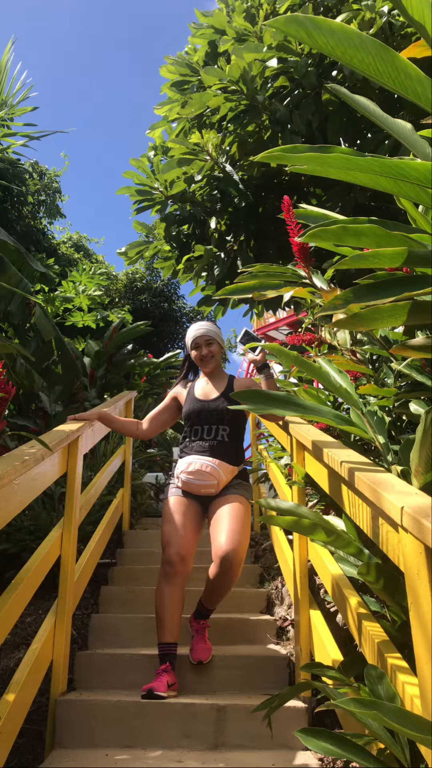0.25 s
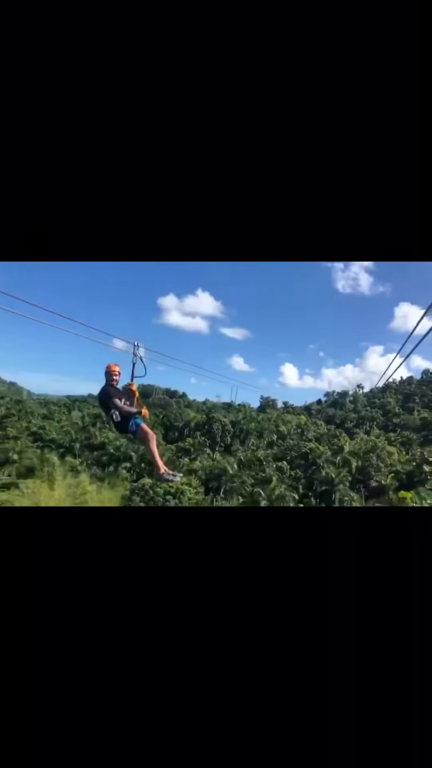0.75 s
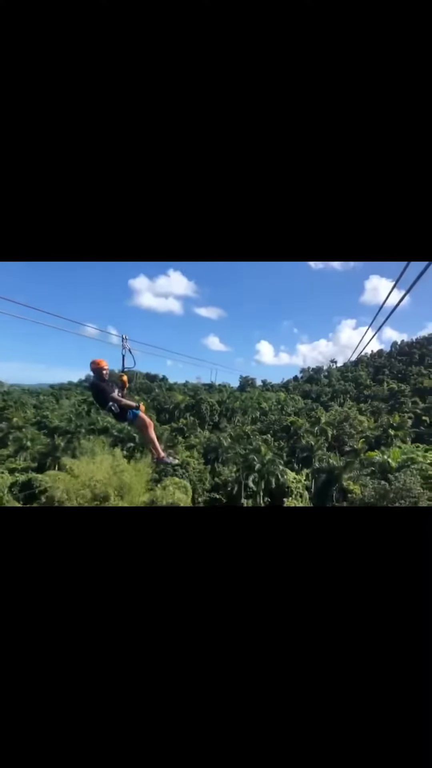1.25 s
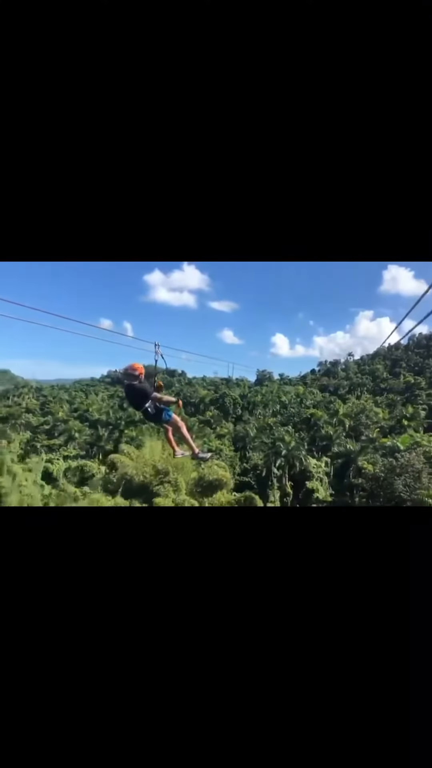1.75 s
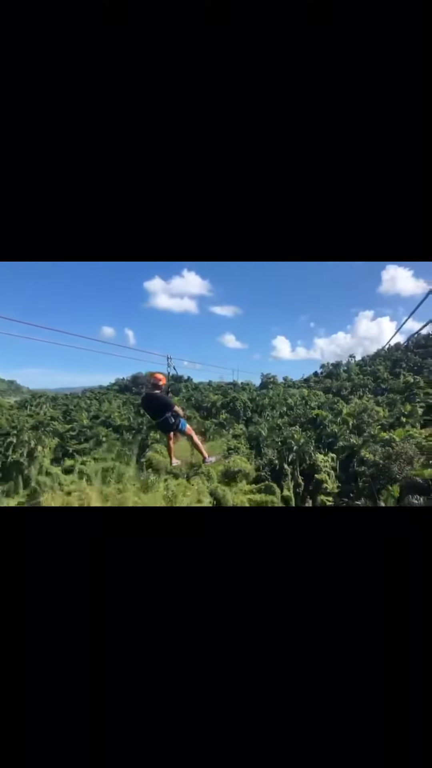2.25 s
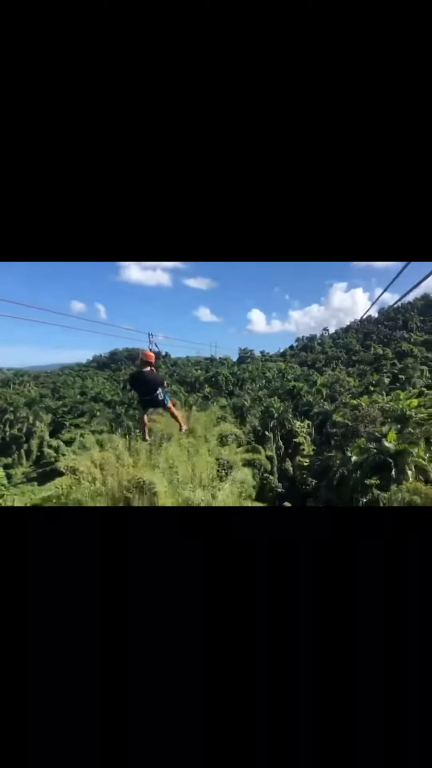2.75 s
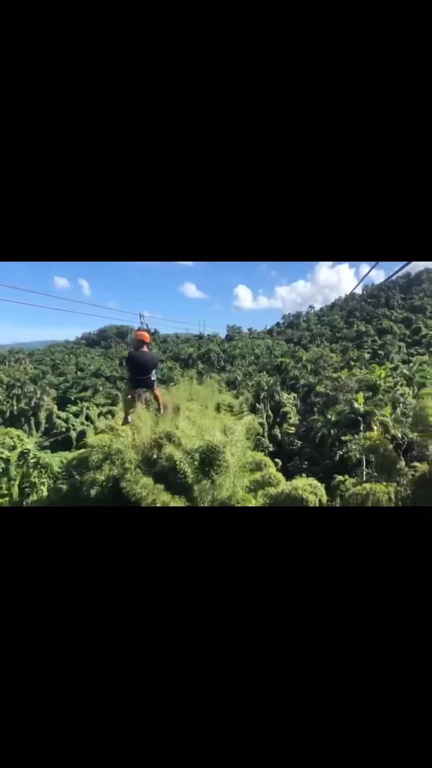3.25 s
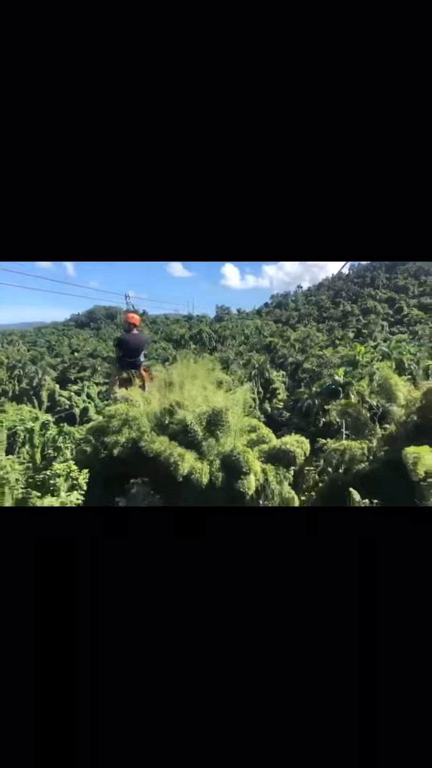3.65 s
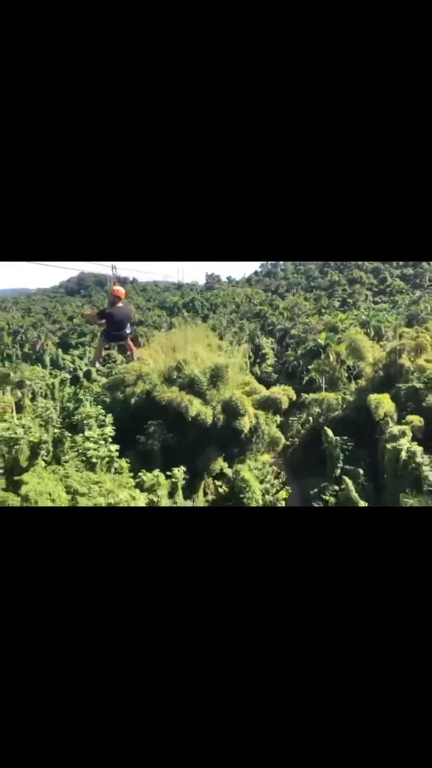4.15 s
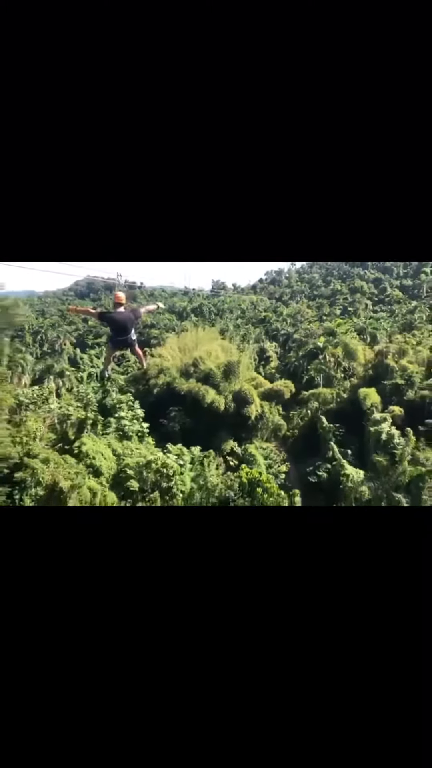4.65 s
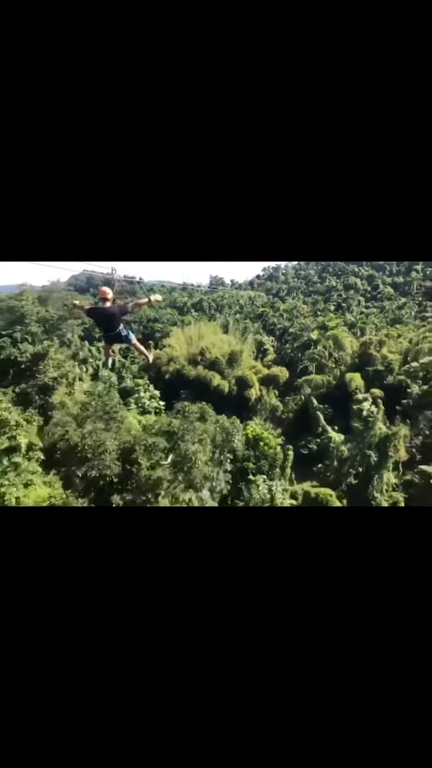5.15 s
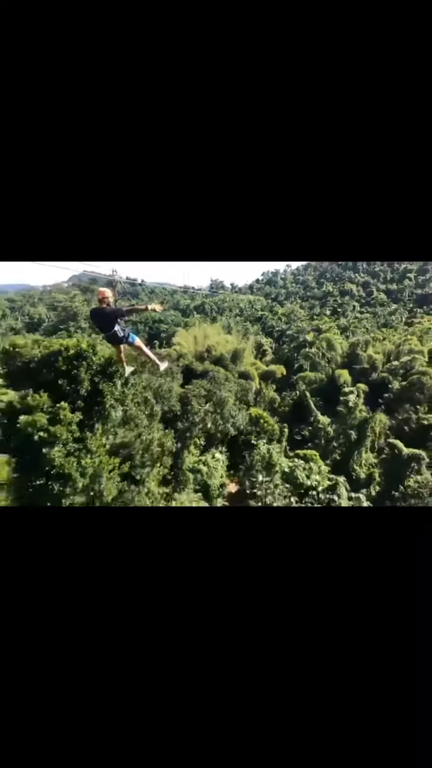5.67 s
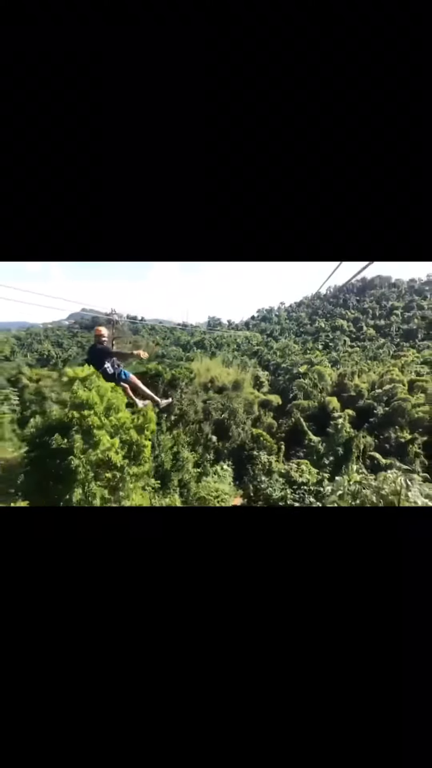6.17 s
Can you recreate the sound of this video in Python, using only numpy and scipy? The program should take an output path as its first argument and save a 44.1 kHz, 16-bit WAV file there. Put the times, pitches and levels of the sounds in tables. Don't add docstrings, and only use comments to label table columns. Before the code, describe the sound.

Outdoors, silence for half a second, then abruptly a zipline trolley is rolling on steel cable: a loud, bright, steady metallic hiss with a thin, slightly beating whine that slowly sinks in pitch as it slows. Wind flutters, puffs and thumps on the microphone, strongest in the middle. The sound is close, nearly mono, slightly grainy, and ends still rolling.

```python
import sys
import numpy as np
from scipy import signal
from scipy.fft import rfft, irfft, next_fast_len
from scipy.io import wavfile
from scipy.ndimage import uniform_filter1d

SR = 44100
rng = np.random.default_rng(int(sys.argv[2]) if len(sys.argv) > 2 else 0)


def dump(signal):
    limited = np.clip(np.atleast_2d(signal).T, -1, 1)
    pcm = np.round(limited * 32767).astype(np.int16)
    wavfile.write(sys.argv[1], SR, pcm)


def rack_gain(trim_db):
    fader = np.asarray(trim_db, float)
    return 10 ** (fader / 20)


N = 282681

# start_s [s], strand_rate_hz [Hz], second_wheel_above_first_hz [Hz]
STRAND = [(0.52, 1523.2, 14.5), (0.85, 1514.2, 20), (1.15, 1504.7, 23.5), (1.55, 1496, 19), (2.0, 1470, 26),
          (2.45, 1457, 17), (2.95, 1422, 20.5), (3.3, 1407, 23), (3.7, 1383.2, 18), (4.0, 1371.9, 18),
          (4.17, 1361.5, 22.5), (4.55, 1349, 21), (4.9, 1329.7, 24), (5.25, 1313, 17.5), (5.5, 1304.3, 18),
          (5.9, 1284, 17.5), (6.41, 1262.9, 16)]


def rms_one(x):
    return x / np.sqrt(np.mean(x ** 2) + 1e-20)


def in_time(rows):
    s, *columns = np.transpose(rows)
    return [np.interp(np.arange(N) / SR, s, column) for column in columns]


def to_spectrum(x):
    return rfft(x, next_fast_len(N))


def to_sound(spectrum):
    return irfft(spectrum, next_fast_len(N))[:N]


def bins_hz():
    size = next_fast_len(N)
    return np.maximum(np.arange(size // 2 + 1) * SR / size, 1)


def at_hz(points, hz):
    table_hz, table_db = np.transpose(points)
    return np.interp(np.log(hz), np.log(table_hz), table_db)


def drift(rate_hz):
    r = np.exp(-40 * np.pi * rate_hz / SR)
    noise = rng.standard_normal(N // 20 + 2002)
    slow = signal.lfilter([1], [1, -2 * r, r * r], noise)[2000:]
    return np.interp(np.arange(N) / 20, np.arange(len(slow)), rms_one(slow))


def band(x, low_hz, high_hz, order):
    return signal.sosfilt(signal.butter(order, [low_hz, high_hz], "band", fs=SR, output="sos"), x)


def resonance(hz, centre_hz, width_hz):
    return 1 / (1 + (2 * (hz - centre_hz) / width_hz) ** 2)


def hiss(shake_db, chatter_db, patchy_db):
    # start_s [s], level_db [dB]
    load = [
        (0.52, -18.5),
        (1.5, -19),
        (2.5, -17),
        (3.0, -18.5),
        (3.5, -17.5),
        (4.1, -17),
        (4.5, -17),
        (5.4, -17),
        (6.41, -17),
    ]
    # pitch_hz [Hz], level_db [dB per Hz]
    wires = [(500, -33.5), (1100, -24), (1700, -18), (2300, -12.5), (3500, -10), (4300, -7), (5000, -4),
             (6300, -2), (7600, -6), (9200, 0), (11000, -5), (13000, -5.5), (14500, -6), (15700, -8.5)]
    # pitch_hz [Hz], width_hz [Hz], level_db [dB]
    metal = [(2720, 350, 3.5), (3120, 250, -4.5), (3650, 250, 1.5), (4250, 250, 1.5), (4610, 160, 4.5),
             (4920, 200, -2.5), (5130, 90, 3.5), (5500, 300, 1.5), (6020, 500, 2.5), (6450, 200, -2.5),
             (8180, 120, 3.5), (9670, 150, 4.5), (14200, 600, 2.5), (14610, 160, 2.0), (14900, 300, -2.0)]
    load_db, = in_time(load)
    strand_hz = in_time(STRAND)[0]
    slowing = (strand_hz.mean() - strand_hz) / np.ptp(strand_hz)
    body_db = 0.2
    plates_db = 0.2 + 2.2 * np.tanh(5.0 * (slowing + .2)) / 2
    axle_db = .05 + 1.1 * slowing

    hz = bins_hz()
    colour_db = at_hz(wires, hz)
    for centre_hz, width_hz, db in metal:
        colour_db = colour_db + db * resonance(hz, centre_hz, width_hz)
    unsteady_db = shake_db * drift(3.3) + chatter_db * (drift(37) + drift(330))
    contacts = rng.standard_normal(N) * rack_gain(unsteady_db)
    ringing = to_spectrum(contacts) * rack_gain(colour_db)
    reference = to_sound(ringing * (hz > 6500) * (hz < 12000))
    ringing = ringing / np.sqrt(np.mean(reference ** 2))

    centres_hz = np.geomspace(800, 16000, 14)
    out = np.zeros(N)
    for k, centre_hz in enumerate(centres_hz):
        share = np.interp(np.log(hz), np.log(centres_hz), np.arange(len(centres_hz)) == k)
        if centre_hz < 3900:
            part_db = body_db
        elif centre_hz < 6500:
            part_db = plates_db
        elif centre_hz > 12000:
            part_db = axle_db
        else:
            part_db = 0
        out += to_sound(ringing * share) * rack_gain(part_db + patchy_db * drift(9))
    return rack_gain(load_db) * out


def whine(gain_db, waver_hz, flicker_db, third_db, second_octave_db):
    # start_s [s], first_wheel_db [dB], second_wheel_db [dB]
    pressure = [
        (0.52, -46, -48),
        (1.45, -46.5, -51),
        (2.05, -42.5, -48),
        (2.9, -43.5, -47),
        (3.55, -44, -50.5),
        (4.45, -44.5, -50.5),
        (5.05, -45.5, -52.5),
        (5.95, -46, -53.5),
        (6.41, -48, -46.5),
    ]
    hz, apart_hz = in_time(STRAND)
    tone_db, second_db = in_time(pressure)
    octave_db = tone_db + 0.5 + 4.5 * resonance(2 * hz, centre_hz=2724, width_hz=480)
    first = 2 * np.pi * np.cumsum(hz + waver_hz * drift(4)) / SR
    second = 2 * np.pi * np.cumsum(hz + apart_hz + 2 * waver_hz * drift(5.7)) / SR
    tones = [(first, tone_db), (2 * first, octave_db), (3 * first, octave_db + third_db),
             (second, second_db), (2 * second, second_db + second_octave_db)]
    out = np.zeros(N)
    for phase, db in tones:
        level = np.sqrt(2) * rack_gain(db + gain_db + flicker_db * drift(14))
        out += level * np.sin(phase)
    return out


def puffs(eddies, drop, swirl_hz, swirl_db, spread):
    half = round(.05 * SR)
    out = np.zeros(N + half)
    t = np.arange(-half, half) / SR
    noise = rms_one(band(rng.standard_normal(N + half), *swirl_hz, order=2))
    for s, db, ms, hz in eddies:
        middle = round(s * SR)
        span = slice(middle - half, middle + half)
        u = t * 1000 / ms
        turns = rng.random() + hz * t * (1 - drop * np.tanh(u))
        swing = np.exp(-2.8 * u ** 2) * np.sin(2 * np.pi * turns)
        swirl = rack_gain(swirl_db) * np.exp(-np.abs(u) / spread) * noise[span]
        out[span] += rack_gain(db) * (swing + swirl)
    return out[:N]


def small_eddies():
    # start_s [s] (middle of the puff), level_db [dB peak], length_ms [ms]
    strong = [(0.672, -26, 4.3), (0.754, -27, 1.7), (0.863, -30.5, 3.7), (1.258, -22, 2.6),
              (1.37, -23.5, 1.6), (1.581, -23, 3.2), (1.722, -26, 4.3), (1.78, -18.5, 1.7),
              (1.815, -21, 3.2), (2.08, -20, 1.5), (2.134, -16.5, 1.7), (2.35, -22.5, 5.3),
              (2.371, -19, 1.4), (2.399, -19, 1.7), (2.504, -20.5, 2.4), (2.681, -19, 0.87),
              (2.692, -18, 3.6), (2.868, -20, 2.1), (3.244, -31.5, 8.9), (3.443, -21, 1.8),
              (3.477, -20.5, 2.4), (3.539, -19, 3.4), (3.572, -16.5, 1.2), (3.887, -23.5, 4.2),
              (4.389, -28.5, 4.1), (4.513, -22.5, 1.9), (4.66, -22, 1.2), (4.843, -20.5, 3.3),
              (5.02, -25, 3), (6.106, -31.5, 4.8)]
    # start_s [s] (middle of the puff), level_db [dB peak]
    weak = [(0.559, -33), (0.681, -29), (0.72, -28.5), (0.993, -30), (1.274, -28.5), (1.651, -25),
            (1.831, -26), (1.891, -24.5), (2.024, -25), (2.198, -24.5), (2.24, -25.5), (2.41, -24.5),
            (2.521, -23), (2.628, -31), (2.756, -27.5), (2.778, -25), (3.393, -25), (3.426, -29),
            (3.633, -29), (3.968, -26.5), (4.233, -27), (4.481, -27), (4.733, -30), (4.909, -27.5),
            (5.129, -27.5), (5.141, -27.5), (5.561, -29.5), (5.749, -31), (5.808, -31), (6.349, -30)]
    eddies = []
    for s, db, ms in list(strong) + [(s, db, 2.8) for s, db in weak]:
        scatter = rng.uniform(-.08, .08)
        eddies.append((s, db, ms, (527 + 12 * ms) * (1 + scatter)))
    return puffs(eddies, drop=.45, swirl_hz=(230, 950), swirl_db=-10, spread=3.0)


def big_eddies():
    # start_s [s] (middle of the thump), level_db [dB peak], length_ms [ms], pitch_hz [Hz]
    thumps = [(0.68, -24.5, 9.5, 201), (0.868, -27.5, 4.8, 193), (1.219, -25.5, 12, 175),
              (1.272, -23, 4.1, 200), (1.439, -26, 8.1, 241), (1.587, -19.5, 7.3, 216),
              (1.655, -27.5, 17, 234), (1.724, -22.5, 8.7, 248), (1.822, -27.5, 23, 178),
              (2.086, -18.5, 5.8, 176), (2.139, -15, 4.5, 226), (2.392, -17, 3.4, 167),
              (2.432, -18, 2.6, 205), (2.519, -23, 4.4, 237), (2.646, -28.5, 9.6, 180),
              (2.89, -28.5, 9.1, 132), (3.139, -25, 12, 213), (3.283, -25, 8.4, 220),
              (3.432, -30, 5.7, 255), (3.479, -17, 6.6, 268), (3.542, -23, 5.1, 128),
              (3.575, -19.5, 2.7, 240), (4.135, -29.5, 12, 174), (4.424, -23.5, 4.3, 153),
              (4.519, -24, 8.3, 189), (4.74, -23, 3.7, 164), (4.847, -17, 5.8, 250), (5.15, -26, 8.3, 190),
              (5.757, -25.5, 11, 169), (6.115, -29, 17, 230)]
    return puffs(thumps, drop=0.47, swirl_hz=(60, 300), swirl_db=-9.5, spread=1.5)


def wind(lumpy_db):
    # start_s [s], level_db [dB]
    gust = [(.52, -43.5), (.7, -38.5), (1.1, -42.5), (1.78, -37), (2.3, -37.5), (2.87, -37.5), (3.3, -41),
            (3.52, -35), (3.7, -43), (3.9, -39), (4.28, -42), (4.55, -38.5), (5.1, -40), (5.3, -44.5),
            (5.8, -39), (5.95, -47.5), (6.2, -48), (6.3, -37.5)]
    # pitch_hz [Hz], level_db [dB per Hz]
    rumble = [(25, -38), (40, -34), (60, -3.5), (95, -3.5), (150, -1.5), (250, -11), (400, -29.5),
              (800, -54)]
    # pitch_hz [Hz], level_db [dB per Hz]
    flutter = [(120, -32.5), (220, 0.5), (320, 2), (500, -7), (700, -5.5), (1000, -23.5), (1400, -55)]
    gust_db, = in_time(gust)
    rumble_db = gust_db - 0.5
    flutter_db = gust_db.mean() - 3 + 1.2 * (gust_db - gust_db.mean())
    out = np.zeros(N)
    for colour, level_db, rate_hz in [(rumble, rumble_db, 14), (flutter, flutter_db, 45)]:
        lumps = rng.standard_normal(N) * rack_gain(lumpy_db * drift(rate_hz))
        coloured = to_sound(to_spectrum(lumps) * rack_gain(at_hz(colour, bins_hz())))
        out += rack_gain(level_db) * rms_one(coloured)
    return out


def scene():
    trolley = hiss(shake_db=-0.24, chatter_db=0.46, patchy_db=0.51)
    trolley += whine(gain_db=1.3, waver_hz=.6, flicker_db=.8, third_db=-7, second_octave_db=-7)
    air = small_eddies() + big_eddies() + wind(lumpy_db=4.5)
    mono = trolley + air
    return np.array([mono, mono])


def camera_grain(x, scatter_db):
    # pitch_hz [Hz], step_db [dB against the local level]
    coarseness = [(300, -16), (1500, -11), (4000, -5), (7000, -2), (10500, 1), (15500, 1.5)]
    hop, top, grid = 1024, 731, 680
    n = np.arange(2 * hop)
    window = np.sin(np.pi * (n[:, None] + .5) / (2 * hop))
    basis = window * np.cos(np.pi / hop * np.outer(n + .5 + hop / 2, np.arange(top) + .5))
    padded = np.pad(x, (2 * hop - grid, 3 * hop))
    count = len(padded) // hop - 1
    lines = np.array([padded[k * hop:(k + 2) * hop] for k in range(count)]) @ basis

    bands = np.arange(top) // 16
    nearby = uniform_filter1d(lines ** 2, size=80, axis=1, origin=24)
    nearby = uniform_filter1d(nearby, size=5, axis=0)
    masked = nearby[:, 8::16][:, bands]
    hz = (np.arange(top) + .5) * SR / (2 * hop)
    scatter = rng.standard_normal((count, bands[-1] // 2 + 1))[:, bands // 2]
    step = np.sqrt(masked + 1e-14) * rack_gain(at_hz(coarseness, hz) + scatter_db * scatter)
    whole = np.floor((np.abs(lines) / step) ** .75 + .4054)
    rounded = np.sign(lines) * step * whole ** (4 / 3)

    frames = rounded @ basis.T * 2 / hop
    out = np.zeros((count + 1, hop))
    out[:-1] += frames[:, :hop]
    out[1:] += frames[:, hop:]
    return out.ravel()[2 * hop - grid:][:N]


def stereo_flecks(mono):
    # start_s [s] (middle of the fleck), pitch_hz [Hz] (middle of the band)
    splits = [(1.281, 8900), (1.304, 6300), (1.304, 10350), (1.327, 6950), (1.327, 8950), (2.047, 13800),
              (2.07, 7600), (2.07, 14500), (2.465, 4700), (2.79, 7600), (2.813, 4700), (2.93, 11000),
              (3.069, 13100), (3.394, 4700), (3.719, 8250), (3.719, 15100), (5.321, 10300), (5.321, 14500),
              (5.507, 11050), (6.018, 5500), (6.018, 9600)]
    mid, side = mono.copy(), np.zeros(N)
    fade = np.hanning(2048)
    for s, centre_hz in splits:
        half_hz = min(1450 / 2, centre_hz / 8.5)
        low_hz, high_hz = centre_hz - half_hz, centre_hz + half_hz
        i = round(s * SR) - 1024
        part = band(mono[i - 512:i + 2048], low_hz, high_hz, order=6)[512:]
        other = band(rng.standard_normal(2560), low_hz, high_hz, order=6)[512:]
        mid[i:i + 2048] -= .25 * fade * part
        side[i:i + 2048] += rack_gain(-2) * fade * rms_one(other) * np.std(part)
    return np.array([mid + side, mid - side])


def roll_off(x):
    return signal.sosfilt(signal.butter(12, 17060, fs=SR, output="sos"), x)


def record(dry):
    mono = signal.sosfilt(signal.butter(3, 55, "high", fs=SR, output="sos"), dry[0])
    mono = camera_grain(mono, scatter_db=3.6)
    start_s = .522
    mono = mono * (np.arange(N) >= start_s * SR)
    return roll_off(stereo_flecks(mono))


dry = scene()
out = record(dry)
dump(out)
```